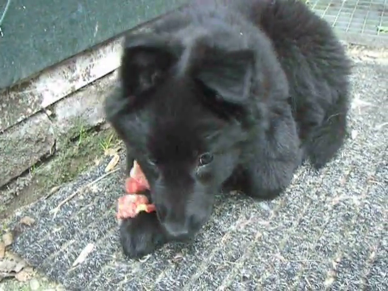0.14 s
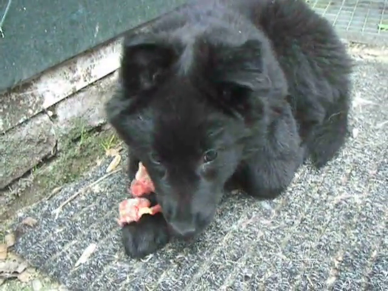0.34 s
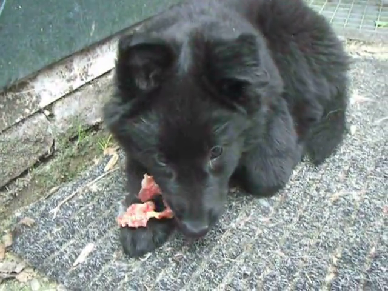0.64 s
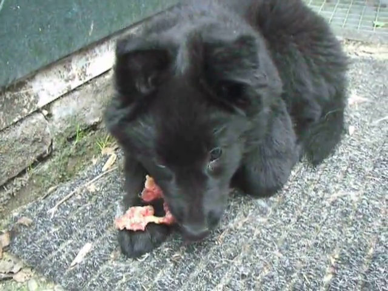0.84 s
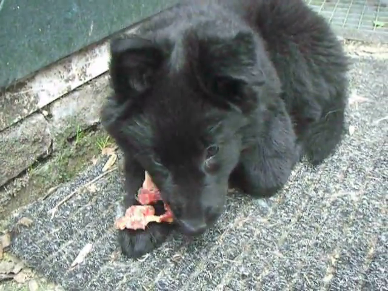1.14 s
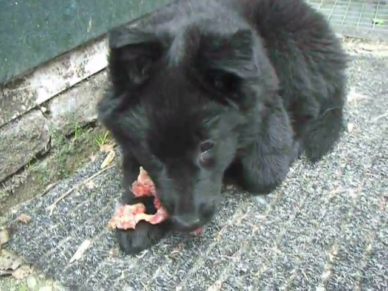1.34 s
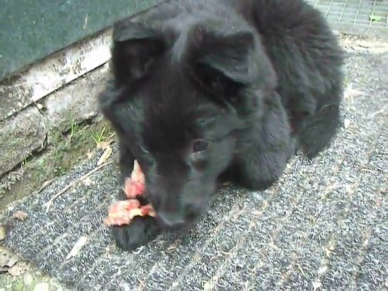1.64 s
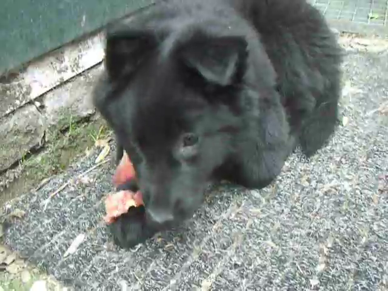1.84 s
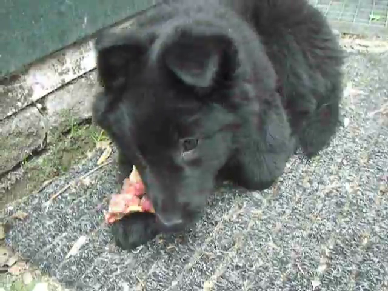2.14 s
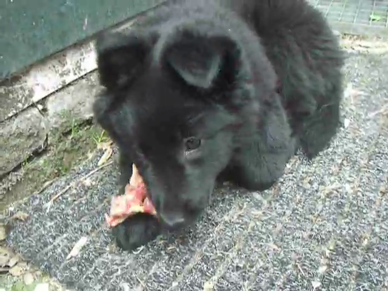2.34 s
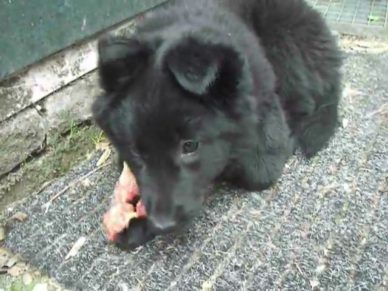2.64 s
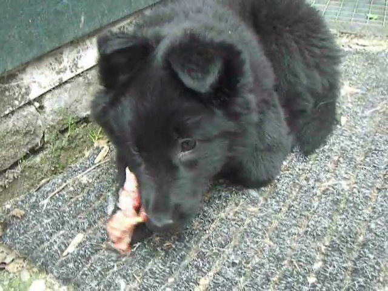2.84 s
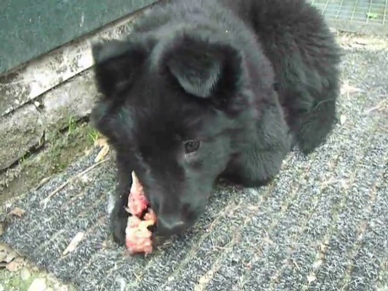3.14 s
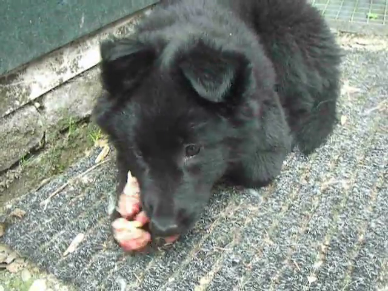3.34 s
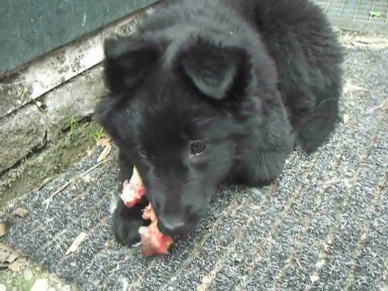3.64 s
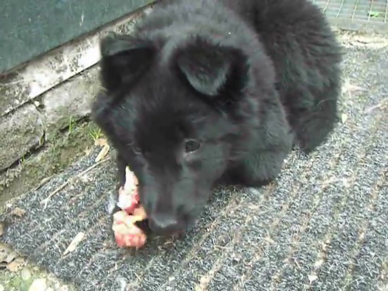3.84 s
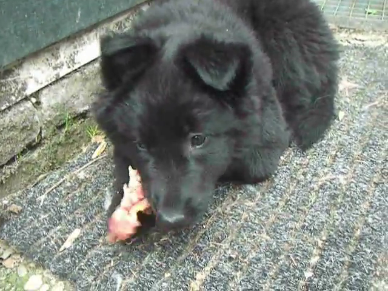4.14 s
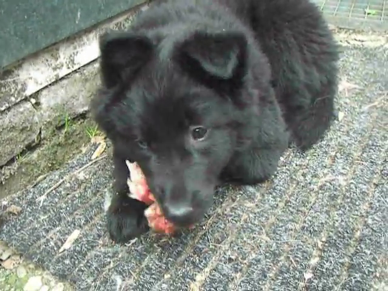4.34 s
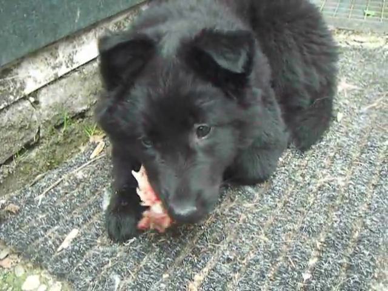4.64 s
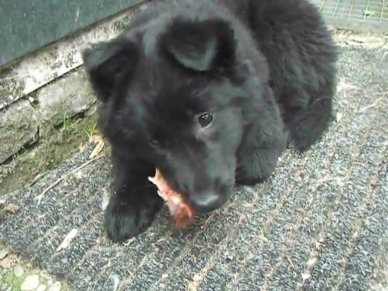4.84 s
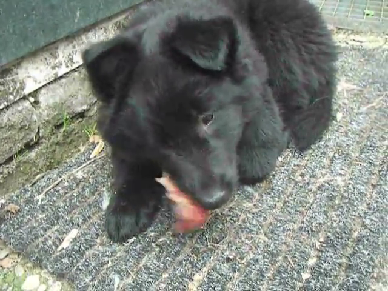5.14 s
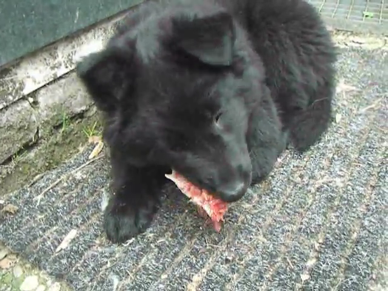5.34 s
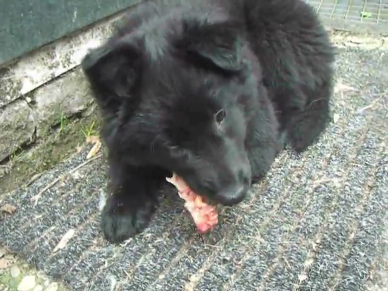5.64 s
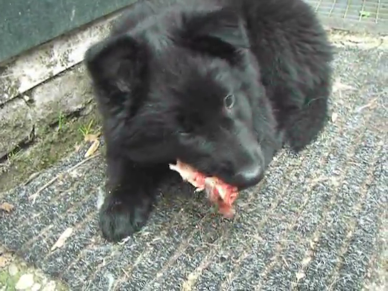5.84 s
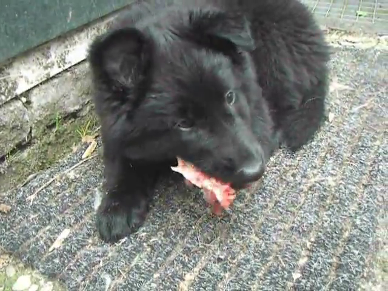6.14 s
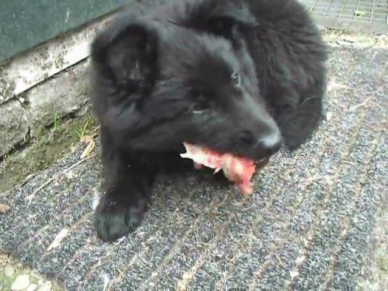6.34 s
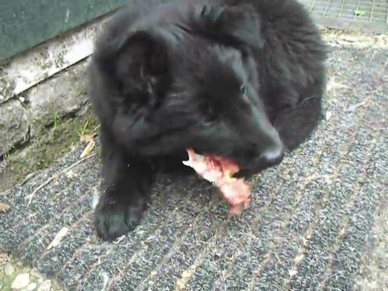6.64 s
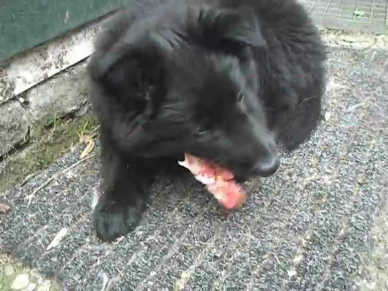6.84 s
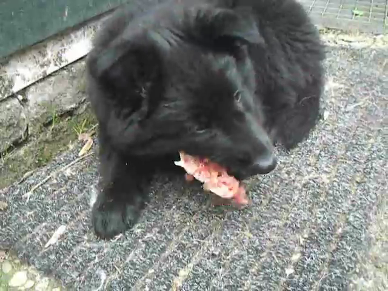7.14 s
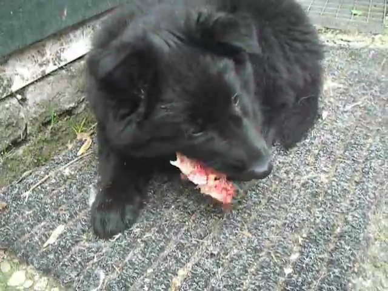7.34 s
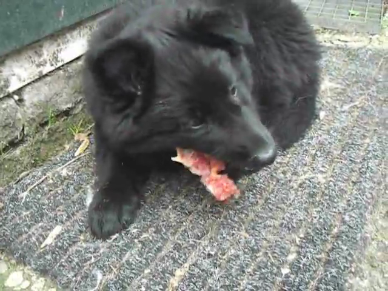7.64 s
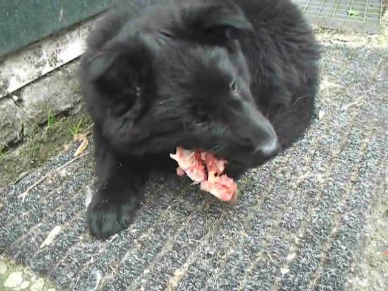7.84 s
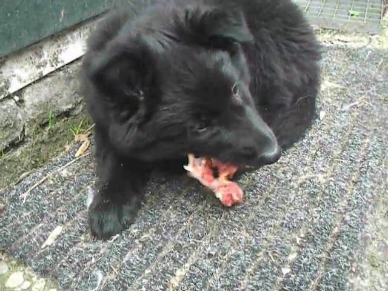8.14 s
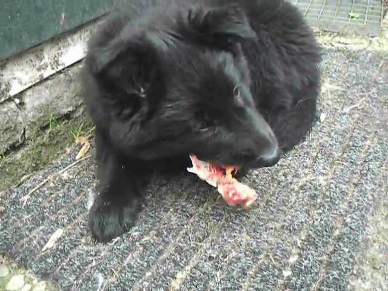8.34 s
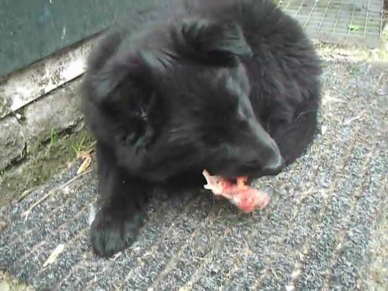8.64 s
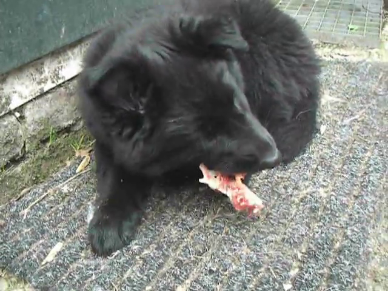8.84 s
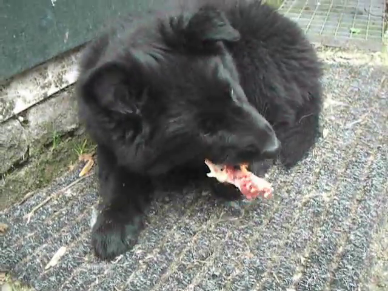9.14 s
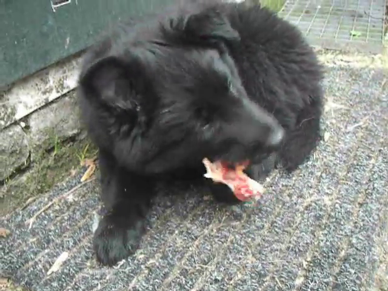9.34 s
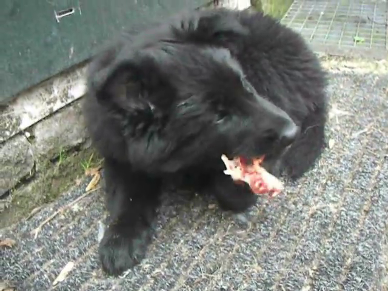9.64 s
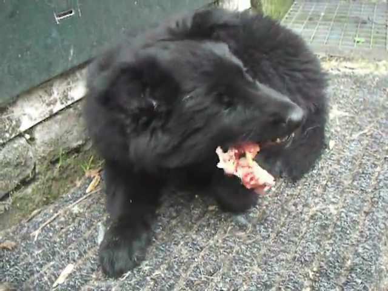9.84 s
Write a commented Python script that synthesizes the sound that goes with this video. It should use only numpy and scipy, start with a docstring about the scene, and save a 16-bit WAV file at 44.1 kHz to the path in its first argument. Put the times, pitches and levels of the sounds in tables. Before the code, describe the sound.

Close, loud cracks and crunches of a puppy chewing a bone outdoors, mixed with clicking hollow knocks and a dull hiss.

```python
"""A puppy gnaws a raw bone outdoors, close to a small camera's microphone: loud cracks ring in its
mouth, teeth tick and squeak on the bone, gristle crunches. Hollow two-pitched knocks with a click
repeat close by, probably the camera's mechanism. The ground and a low wall throw back short echoes.
A far bird chirps once and a faint coo wavers near the end, over a steady hiss. The mono recorder is
narrow-band, carries a DC offset and clips on the hardest cracks."""
import sys
import numpy as np
from scipy import signal
from scipy.io import wavfile
from scipy.ndimage import uniform_filter1d

SR = 44100
rng = np.random.default_rng(int(sys.argv[2]) if len(sys.argv) > 2 else 0)


def unload_audio(sound):
    """Save the sound as a 16-bit wav file, at the path given as the first command line argument."""
    columns = np.transpose(np.atleast_2d(sound))
    # keep every value between -1 and 1, then stretch to whole-number steps
    steps = np.round(np.clip(columns, -1, 1) * 32767)
    wavfile.write(sys.argv[1], SR, steps.astype(np.int16))


N = 10 * SR


def amp(db):
    return 10 ** (np.asarray(db) / 20)


def unit_rms(x):
    return x / np.sqrt(np.mean(x ** 2) + 1e-20)


def add(mix, start_s, sound):
    part = mix[round(start_s * SR):][:len(sound)]
    part += sound[:len(part)]


def ring(hz, t60_s, rise_s, hold_s=0):
    """A mode with a soft start, driven for hold_s and then dying; its envelope peaks at 1."""
    t = np.arange(8000) / SR
    envelope = (1 - np.exp(-t / rise_s)) ** 2 * amp(-60 * np.maximum(t - hold_s, 0) / t60_s)
    return envelope / envelope.max() * np.sin(2 * np.pi * hz * t)


def resonate(x, hz, width_hz, passes=1):
    """A resonance, fixed or gliding: each pass shifts hz down to zero, smooths and shifts back."""
    carrier = np.exp(2j * np.pi * np.cumsum(hz * np.ones(len(x))) / SR)
    pole = np.exp(-np.pi * width_hz / SR)
    for _ in range(passes):
        x = 2 * (carrier * signal.lfilter([1 - pole], [1, -pole], x / carrier)).real
    return x


def low_pass(x, hz):
    return signal.oaconvolve(x, signal.firwin(201, hz, window=("kaiser", 10), fs=SR)[None], "same")


def fractures(per_s, spread_db):
    """A random train of tiny breaks of uneven size."""
    size = amp(spread_db * np.minimum(rng.exponential(1, N), 4))
    return size * (rng.random(N) < per_s / SR) * rng.choice([-1, 1], N)


def click(hz, noise):
    """A hard contact: a short bright ring with a wide noisy smack."""
    t = np.arange(len(noise)) / SR
    burst = noise * np.exp(-t / 0.0024) * np.minimum(t / 0.00037, 1)
    smack = resonate(burst, hz, 1200, passes=2)
    sound = ring(hz, t60_s=0.008, rise_s=0.0005)
    add(sound, 0, 1.2 * smack / abs(smack).max())
    return sound


def breathy_tone(start_s, length_s, hz, glide_hz, level_db, breath, width_hz):
    """A sine and a narrow band of noise share an even glide, swelling and fading together."""
    out, progress = np.zeros(N), np.linspace(0, 1, round(length_s * SR))
    pitch_hz = hz + glide_hz * progress
    air = resonate(rng.standard_normal(N)[:len(progress)], pitch_hz, width_hz, passes=2)
    tone = np.sin(2 * np.pi * np.cumsum(pitch_hz) / SR) + breath * unit_rms(air)
    add(out, start_s, amp(level_db) * unit_rms(tone) * np.sin(np.pi * progress ** 0.7))
    return out


# Spectrum of the background in the yard: frequency_hz, relative_db
HISS_SPECTRUM = [(35, -44.5), (60, -12), (125, -6.5), (219, -5.5), (252, -6), (325, -5), (362, -11.5),
                 (403, 0.5), (441, -5), (482, -4.5), (783, -4), (920, -2), (2100, -12.5), (3800, -21),
                 (4390, -49.5), (5710, -59.5), (9660, -120)]


def hiss(level_db=-40.5):
    """A steady dull hiss with faint patches drifting through its spectrum."""
    frames, bin_hz = N // 512 + 5, np.fft.rfftfreq(2048, 1 / SR)
    real, imag, patches = rng.standard_normal((frames, 1025, 3)).T
    drift_db = 1.36 * unit_rms(uniform_filter1d(uniform_filter1d(patches, 20, axis=0), 6, axis=1))
    frequency_hz, relative_db = np.transpose(HISS_SPECTRUM)
    colour_db = np.interp(np.log(bin_hz + 1), np.log(frequency_hz + 1), relative_db)
    spectra = (real + 1j * imag) * amp(colour_db[:, None] + drift_db)
    return amp(level_db) * unit_rms(signal.istft(spectra, nperseg=2048, noverlap=1536)[1][:N])


# Faint, unbroken chewing close to the microphone: time_s, level_db
GNAW_LEVELS = [(0.0, -55), (1.75, -55.5), (2.87, -50.5), (3.3, -55.5), (4.43, -51), (6.1, -54.5),
               (6.6, -54.5), (7.38, -48), (7.6, -57.5), (8.13, -49), (8.88, -54.5), (9.44, -52),
               (10.0, -55.5)]


def gnawing():
    """Sparse fractures go on in sticky clusters between the bites."""
    clusters = unit_rms(uniform_filter1d(uniform_filter1d(rng.standard_normal(N), 700), 700))
    breaks = fractures(per_s=900, spread_db=2.5) * amp(3 * clusters)
    crackle = resonate(breaks, 3100, 1200, passes=2) + 0.085 * resonate(breaks, 1050, 230)
    level_db = np.interp(np.arange(N) / SR, *np.transpose(GNAW_LEVELS))
    return amp(level_db) * unit_rms(crackle)


# Low and high mode of a knock: pitch_hz, t60_s, rise_s
KNOCK_MODES = [(284, 0.1, 0.0015), (619, 0.051, 0.0028)]
# Knocks by the microphone, probably the camera's mechanism: start_s, low_mode_db, high_mode_db, click_db
HOLLOW_KNOCKS = [(0.053, -34, -24, -25), (0.252, -28.5, -29.5, -37), (0.461, -25.5, -36, -28),
                 (0.586, -41, -21.5, -31.5), (2.518, -29, -32.5, -31), (2.627, -38.5, -22.5, -31.5),
                 (2.888, -32, -24.5, -23), (3.053, -29, -30.5, -36.5), (3.251, -25, -32.5, -37),
                 (3.461, -33.5, -20.5, -34), (5.751, -32, -33, -30), (5.961, -35.5, -21.5, -29),
                 (6.087, -34.5, -23.5, -27.5), (6.293, -34.5, -27.5, -32.5), (6.515, -33, -31, -35.5),
                 (6.627, -26.5, -36, -31), (6.885, -42, -25, -34), (9.251, -28.5, -31, -30),
                 (9.46, -25, -34, -30.5), (9.587, -27, -34, -35), (9.795, -43, -26, -31)]


def hollow_knocks(click_lead_s=0.0024):
    """Each knock clicks, then shares itself differently between the two hollow modes."""
    out = np.zeros(N)
    for start_s, *mode_dbs, click_db in HOLLOW_KNOCKS:
        noise = rng.standard_normal(400)
        contact = click(2865, noise) + amp(-2.5) * click(1870, noise[::-1])
        add(out, start_s - click_lead_s, amp(click_db) * contact)
        detune = 1 + 0.0124 * noise[0]
        for level_db, (pitch_hz, t60_s, rise_s) in zip(mode_dbs, KNOCK_MODES):
            add(out, start_s, amp(level_db) * ring(pitch_hz * detune, t60_s, rise_s))
    return out


# Resonances of the gristle, three dull then two bright: pitch_hz, width_hz, relative_db
GRISTLE_MODES = [(590, 620, 9), (1090, 400, 1.5), (1520, 930, 6), (2250, 1300, 12), (3020, 620, 5.5)]
# Bites into gristle, close up: peak_s, build_s, fade_s, level_db, treble_db (relative to level_db)
GRISTLE_BITES = [(.4, 0.15, 0.033, -32.5, -16), (.93, 0.056, 0.25, -39.5, -5), (1.555, .015, .2, -40, -23),
                 (2.516, 0.015, .09, -32.5, -24), (2.848, 0.05, 0.012, -31.5, -19),
                 (3.362, .005, 0.07, -34, -14), (3.849, .005, .12, -33.5, -20),
                 (4.06, .035, 0.016, -34, -7), (4.261, 0.0056, .05, -36, -18),
                 (4.306, 0.0056, .04, -34, -19), (4.725, 0.0054, 0.087, -35.5, 0),
                 (5.61, 0.089, 0.095, -40, -0.5), (6.085, 0.013, .004, -35, 6),
                 (6.119, 0.0053, .004, -21.5, 6.5), (7.318, 0.0083, .005, -21.5, -3),
                 (8.065, 0.29, .03, -48, 1), (8.2, .004, 0.12, -25, 0.5),
                 (8.525, 0.0055, 0.26, -39.5, -1.5), (8.6, .008, 0.083, -29.5, -8.5),
                 (9.165, 0.017, .04, -39, -16), (9.248, 0.057, 0.034, -28.5, -11),
                 (9.294, 0.0045, 0.047, -27.5, -20), (9.68, 0.0066, 0.051, -40.5, -4),
                 (9.91, 0.084, 0.11, -36, -3)]


def gristle_crunches(fall_db=24):
    """Dense fractures ring the gristle's dull and bright modes, building and fading with each bite."""
    dull, bright = np.zeros(N), np.zeros(N)
    for peak_s, build_s, fade_s, level_db, treble_db in GRISTLE_BITES:
        t = np.arange(-build_s, fade_s, 1 / SR)
        envelope = amp(level_db - fall_db * np.maximum(-t / build_s, t / fade_s))
        add(dull, peak_s + t[0], envelope)
        add(bright, peak_s + t[0], amp(treble_db) * envelope)
    breaks, modes = fractures(per_s=6000, spread_db=1.7), []
    for k, (pitch_hz, width_hz, relative_db) in enumerate(GRISTLE_MODES):
        drive = np.roll(breaks, 999 * k)  # shifted so the modes ring independently
        modes.append(amp(relative_db) * resonate(drive, pitch_hz, width_hz, passes=2) / np.sqrt(width_hz))
    return 0.89 * dull * unit_rms(sum(modes[:3])) + bright * unit_rms(sum(modes[3:]))


# Teeth on bone, close up: start_s, level_db, pitch_hz, mouth_db (relative to level_db)
TOOTH_TICKS = [(0.3982, -21, 3120, -9), (1.934, -31, 3730, -14), (2.8432, -30.5, 2560, 2),
               (2.87, -32, 2870, 0), (3.274, -31, 2250, -10), (3.4877, -32.5, 2680, -10),
               (3.575, -36, 2240, -9), (4.1839, -35, 2170, -11), (4.2067, -27, 2730, 1.5),
               (4.287, -39, 2570, -10), (4.334, -32, 3300, -10), (4.346, -38, 3330, -8),
               (4.4332, -29.5, 3180, -12), (4.4783, -28.5, 3420, -9), (4.4887, -32, 2550, -10),
               (4.5281, -34.5, 2760, -10), (4.6864, -28.5, 3350, -9), (4.7104, -31, 2850, -10),
               (4.8234, -37, 2930, -7), (4.837, -31, 3270, 2), (5.1634, -34, 3720, -8),
               (5.2044, -37, 3550, -9), (5.2145, -32, 3480, -13), (5.5528, -35, 3160, -9),
               (5.5785, -29, 3480, -5), (5.6552, -32.5, 3340, -10), (5.7209, -38, 2890, -9),
               (5.7674, -34, 2390, -8), (5.7793, -25, 3480, -7), (6.204, -36, 3130, -11),
               (6.3409, -29, 2530, -13), (6.376, -25.5, 2370, -13), (6.6526, -35, 2390, -8),
               (6.6896, -36, 3120, -8), (6.714, -34.5, 2850, -10), (6.756, -30, 3160, -10.5),
               (6.98, -33, 3080, -10), (7.0194, -33, 3100, -10), (7.2485, -39, 3360, -12),
               (7.261, -27.5, 3100, -13), (7.275, -28, 3170, -8), (7.4355, -27, 3230, -18),
               (7.446, -33, 3260, -5), (7.4534, -39, 3230, -10), (7.483, -30, 3150, -12),
               (7.49, -31.5, 3140, -13), (7.5614, -34, 3100, -10), (7.991, -32.5, 2800, -10),
               (8.019, -28, 3280, -6), (8.058, -28.5, 3240, 0.5), (8.5046, -36, 3060, -8),
               (9.4409, -31, 2920, 2), (9.5005, -30, 2710, -10), (9.5154, -25.5, 2780, -2.5),
               (9.756, -31.5, 2880, -7), (9.816, -32, 2740, -11)]


def tooth_ticks():
    """A tooth slips off the bone: a wet tick and a brief ring of the mouth."""
    out = np.zeros(N)
    for start_s, level_db, pitch_hz, mouth_db in TOOTH_TICKS:
        noise = rng.standard_normal(400)
        mouth = ring(1100 + 70 * noise[0], t60_s=0.012, rise_s=0.00053)
        add(out, start_s, amp(level_db) * (click(pitch_hz, noise) + amp(mouth_db) * mouth))
    return out


# Bone breaking in the mouth, close up: start_s, level_db, mouth_hz, t60_s, cheek_db, shaft_hz,
# shaft_db, splinter_hz, splinter_db, jaw_db (the later levels are relative to level_db)
BONE_CRACKS = [(0.8776, -3, 1217, 0.016, -18.5, 2138, -13.5, 2760, -10.5, -21),
               (0.8946, -21.5, 1090, .019, -16, 2100, -9.5, 2740, -10.5, -28),
               (1.2447, -15, 1190, 0.02, -18, 2460, -18, 2720, -12, -24),
               (1.2485, -7.5, 1120, 0.022, -25, 2120, -16, 2600, -12.5, -25.5),
               (2.483, -5.5, 1233, .012, -3.5, 2200, -5, 2560, -11.5, -43),
               (2.4855, -10, 1150, 0.026, -12, 2120, -13, 3620, -13.5, -32),
               (3.248, -24, 1134, .029, -22, 1780, -5.5, 2850, -3, -20),
               (3.3504, -0.5, 1284, 0.015, -1.5, 2130, 6.5, 2760, -5.5, -14.5),
               (3.8328, 3.5, 1080, .019, -19, 2065, -8, 2713, -7.5, -19),
               (4.2386, 0.5, 1080, 0.013, -20, 2314, -4, 2526, -5, -15),
               (4.643, -7.5, 1091, 0.021, -22, 1930, -6, 2630, 0.5, -5.5),
               (4.7176, -31.5, 1530, 0.028, -5, 1690, 9.5, 3160, 0.5, 0),
               (5.0653, -23, 1090, 0.031, -7, 2100, -4, 2640, -4, -11.5),
               (5.1238, -30.5, 1000, .018, -14, 2630, -11, 2430, 8.5, 10.5),
               (5.6095, -22.5, 1070, .012, -4, 2120, 0, 3290, 4.5, -22),
               (6.1186, -18, 1116, .016, -4, 2160, 11, 2900, -2, -24),
               (6.1208, -26, 1250, .014, -8, 2160, 8, 3220, 16, -18.5),
               (7.2672, -27, 1040, .016, -1, 2260, -22, 3280, -6, -19),
               (7.316, -30.5, 1020, .02, 6, 2450, 4, 2640, 11, -9),
               (7.3226, -15.5, 1087, 0.022, -4.5, 2680, -13, 2530, 5.5, -10),
               (7.3809, -24.5, 1090, .014, -12, 2340, 5.5, 3200, 12, -12),
               (8.1969, -13.5, 1493, .025, -9, 1990, -0.5, 2990, -21, -12),
               (8.2105, -24.5, 1400, 0.016, -2.5, 2300, 3, 3200, 2.5, -1),
               (8.4658, -3.5, 1052, .02, -14.5, 2275, -12.5, 3110, -12.5, -23.5),
               (8.603, -31.5, 1530, 0.02, 4, 1890, -7, 2610, -16, -19),
               (8.8509, -22.5, 1060, 0.019, -3, 1950, -15, 2870, -17, -25.5),
               (8.912, -12.5, 1027, 0.021, -1, 2180, -15.5, 2580, -16.5, -27),
               (9.2779, -14, 1098, 0.014, 12.5, 2260, 0, 2800, 1.5, -16),
               (9.62, -27.5, 1510, 0.026, -11, 2000, 2.5, 2730, -10, 1),
               (9.661, -14.5, 800, 0.012, -6, 2160, 4, 3310, -3.5, -10.5)]


def bone_cracks(break_s=0.0016, cheek_hz=939, jaw_hz=356.5, creak_db=-32.5):
    """The bone creaks under load, then breaks: mouth, cheek, shaft, splinters and jaw ring."""
    out, t = np.zeros(N), np.arange(300) / SR
    jaw = ring(jaw_hz, t60_s=0.0076, rise_s=0.0016)
    burst = np.exp(-t / 0.00097) * np.minimum(t / 0.0035, 1)
    for (start_s, level_db, mouth_hz, t60_s, cheek_db, shaft_hz,
         shaft_db, splinter_hz, splinter_db, jaw_db) in BONE_CRACKS:
        shard_noise, creak_noise = rng.standard_normal((2, len(t)))
        creak = resonate(creak_noise, splinter_hz, 900) + resonate(creak_noise, mouth_hz, 400)
        swell = amp(level_db + creak_db) * (t / t[-1]) ** 1.5
        add(out, start_s - len(t) / SR, swell * unit_rms(creak))
        mouth = ring(mouth_hz, t60_s, rise_s=0.0006, hold_s=break_s)
        cheek = ring(cheek_hz, t60_s, rise_s=0.00017, hold_s=break_s)
        shaft = ring(shaft_hz, 0.55 * t60_s, rise_s=0.00013, hold_s=break_s)
        crack = mouth - amp(cheek_db) * cheek + amp(shaft_db) * shaft + amp(jaw_db) * jaw
        splinter = ring(splinter_hz, t60_s=0.01, rise_s=0.0005, hold_s=break_s / 2)
        add(crack, break_s / 2, amp(splinter_db) * splinter)
        shards = resonate(shard_noise * burst, 3200, 1200, passes=2)  # the rough edge of the break
        add(crack, 0, amp(splinter_db - 2) * shards / abs(shards).max())
        add(out, start_s, amp(level_db) * crack)
    return out


def tooth_squeak():
    """A tooth drags over the bone with a raspy, slightly falling squeak."""
    return breathy_tone(start_s=0.91, length_s=0.11, hz=2490, glide_hz=-150,
                        level_db=-41, breath=3, width_hz=220)


def bird_chirp():
    """A far bird gives one short rising chirp."""
    return breathy_tone(start_s=2.65, length_s=0.04, hz=3150, glide_hz=520,
                        level_db=-47, breath=0.8, width_hz=100)


# Notes of a coo, faint at the microphone: start_s, length_s, pitch_hz, level_db
COO_NOTES = [(9.338, 0.094, 566, -39), (9.411, 0.12, 616, -40), (9.54, .06, 565, -42),
             (9.631, .13, 618, -36), (9.788, .06, 598, -34.5), (9.866, 0.033, 562, -39.5)]


def coo():
    """Short breathy notes step up and down in a wavering coo."""
    return sum(breathy_tone(start_s, length_s, pitch_hz, 0, level_db, breath=2.5, width_hz=80)
               for start_s, length_s, pitch_hz, level_db in COO_NOTES)


# Reflections reaching the microphone from the ground and the wall: delay_s, level_db
YARD_ECHOES = [(.006, -21.5), (0.018, -50.5), (.035, -38.5)]


def yard(x, t60_s=0.092, tail_db=-17.5, taps_per_s=3000):
    """The ground and the low wall add a few echoes and a short sparse tail."""
    t = np.arange(7000) / SR
    taps = rng.choice([-1., 1.], len(t)) * (rng.random(len(t)) < taps_per_s / SR)
    taps *= amp(-60 * t / t60_s) * (t > 0.005)
    taps *= amp(tail_db) / np.linalg.norm(taps)
    taps[0] = 1  # the direct sound
    for delay_s, level_db in YARD_ECHOES:
        add(taps, delay_s, amp([level_db]))
    return signal.oaconvolve(x, taps)[:N]


def scene():
    """The close sounds echo in the yard; coo, bird and hiss lie behind them, all in mono."""
    near = tooth_squeak() + bone_cracks() + tooth_ticks()
    near += hollow_knocks() + gristle_crunches() + gnawing()
    calls = coo() + bird_chirp()
    return (yard(near) + calls + hiss())[None]


def record(dry, dc_offset=-0.0586, input_ceiling=0.95, band_hz=4600):
    """A microphone with dips in its treble feeds a narrow-band input that overloads on hard cracks."""
    treble_band = signal.butter(2, [4200, 5600], "band", fs=SR, output="sos")
    softened = dry - 0.067 * signal.sosfilt(treble_band, dry)
    notched = softened - 0.29 * resonate(softened[0], hz=3940, width_hz=380)
    overloaded = np.clip(notched + dc_offset, -input_ceiling, input_ceiling)
    narrow = np.clip(low_pass(overloaded, band_hz), -1, 1)  # the filter's overshoot clips too
    noise_floor = amp(-100) * rng.standard_normal(dry.shape)
    return low_pass(narrow + noise_floor, hz=17500)


dry = scene()
out = record(dry)
unload_audio(out)
```